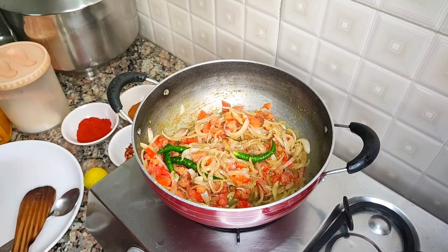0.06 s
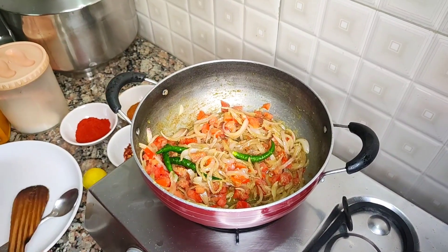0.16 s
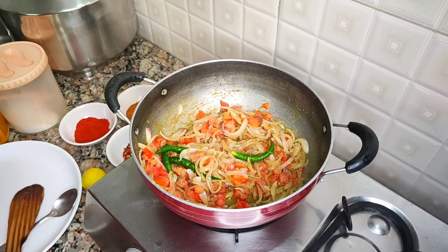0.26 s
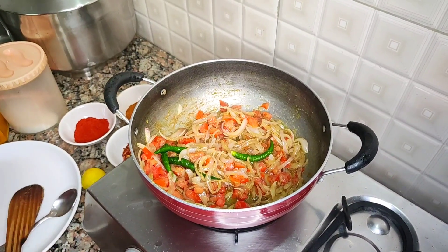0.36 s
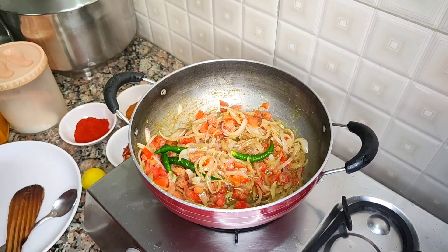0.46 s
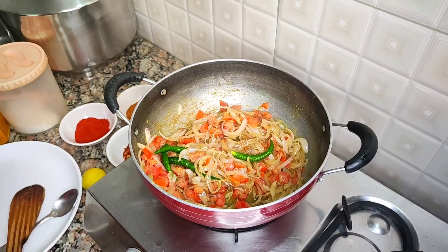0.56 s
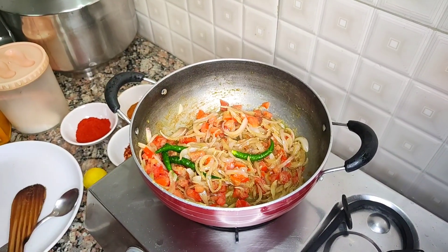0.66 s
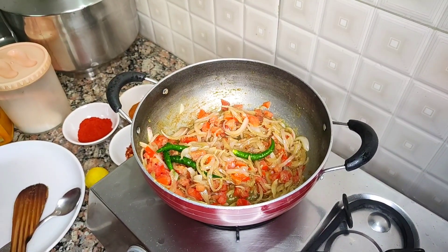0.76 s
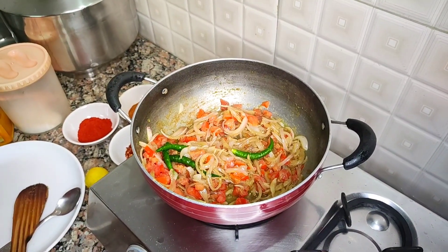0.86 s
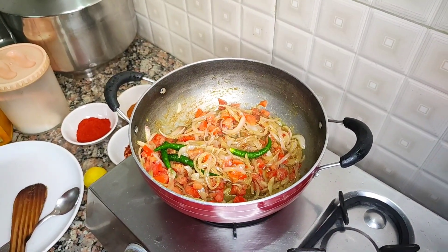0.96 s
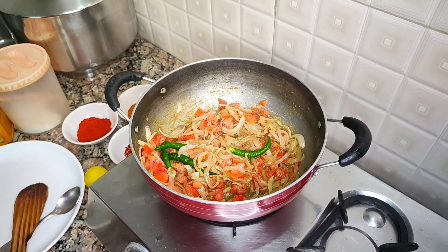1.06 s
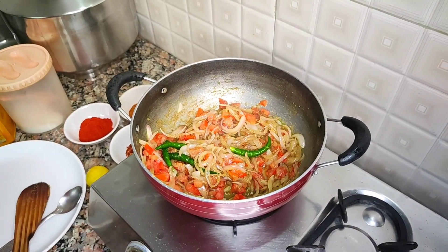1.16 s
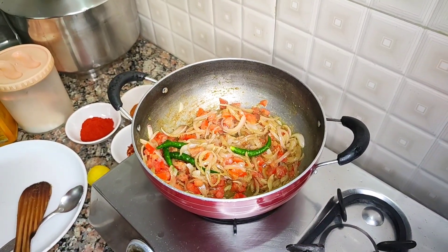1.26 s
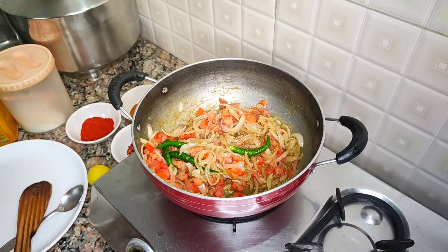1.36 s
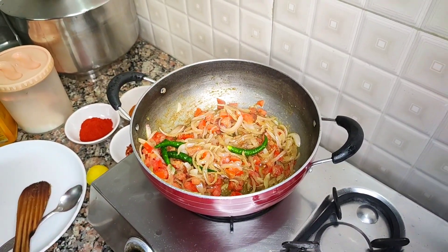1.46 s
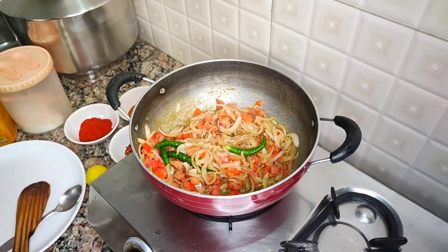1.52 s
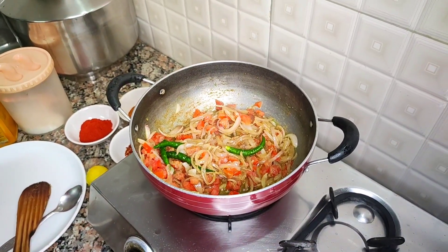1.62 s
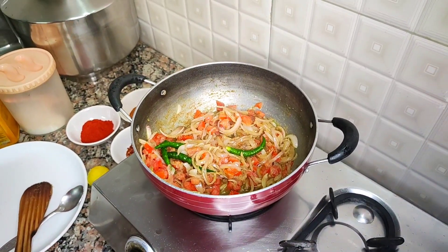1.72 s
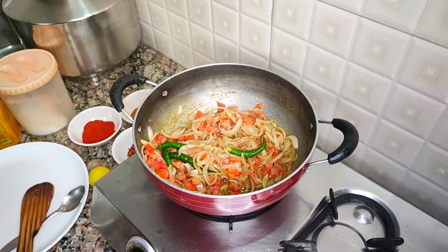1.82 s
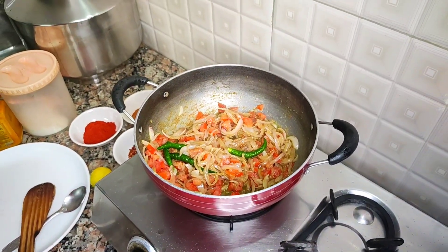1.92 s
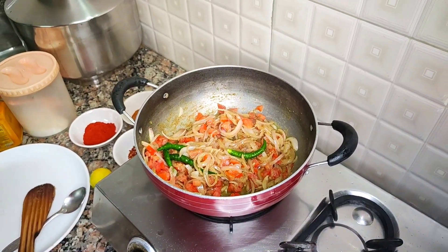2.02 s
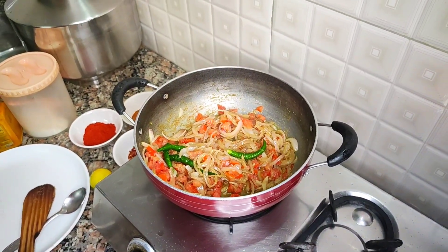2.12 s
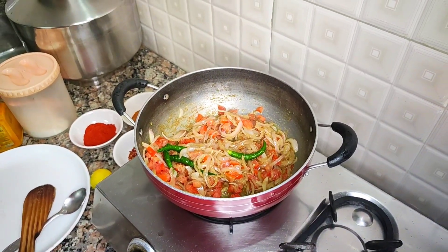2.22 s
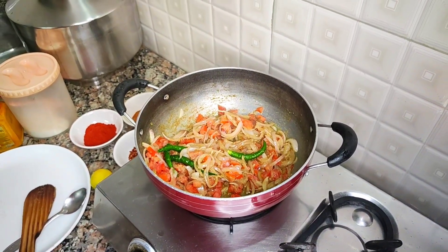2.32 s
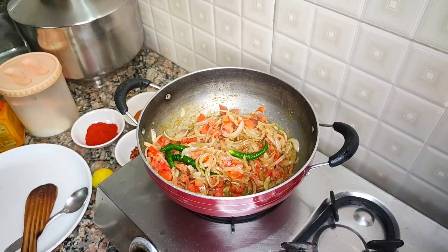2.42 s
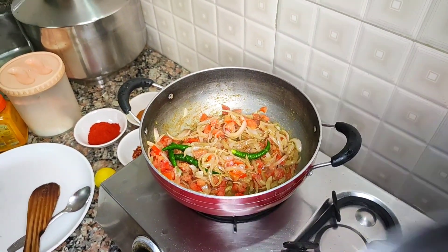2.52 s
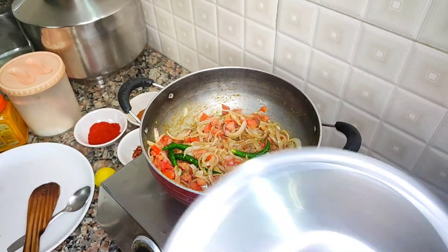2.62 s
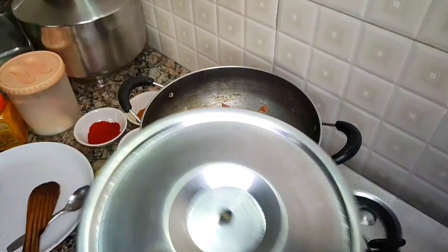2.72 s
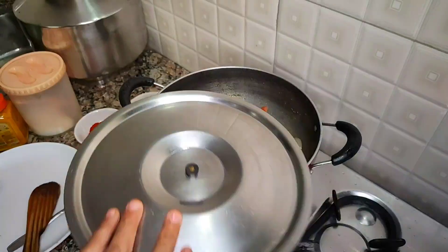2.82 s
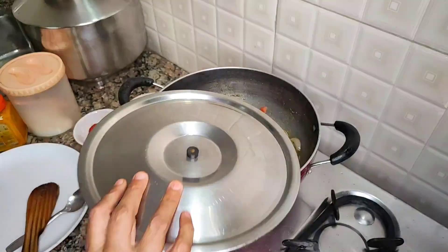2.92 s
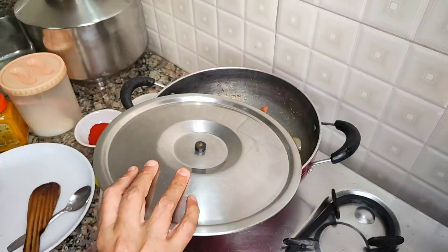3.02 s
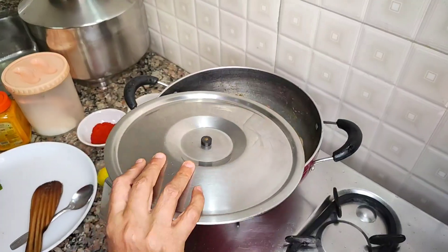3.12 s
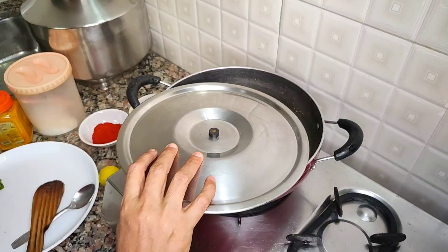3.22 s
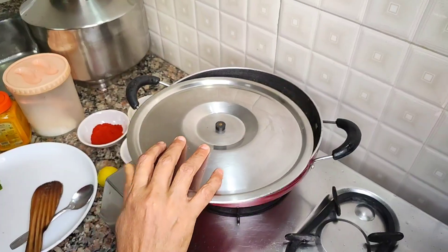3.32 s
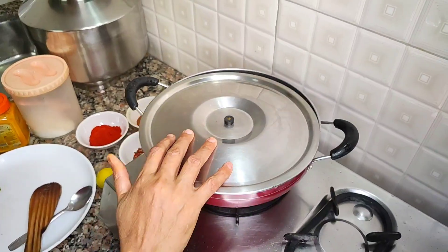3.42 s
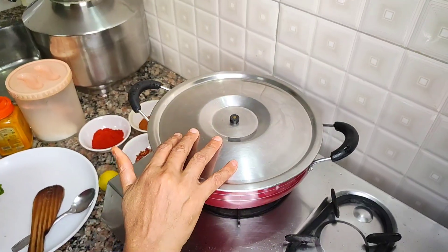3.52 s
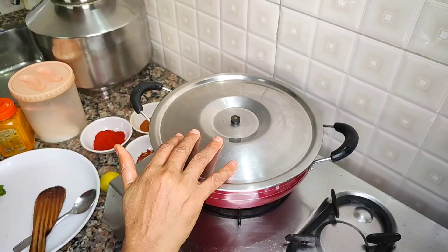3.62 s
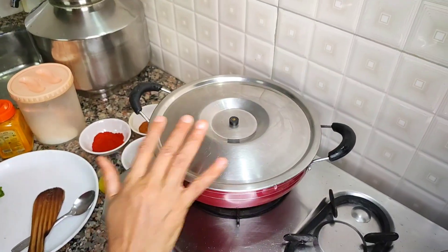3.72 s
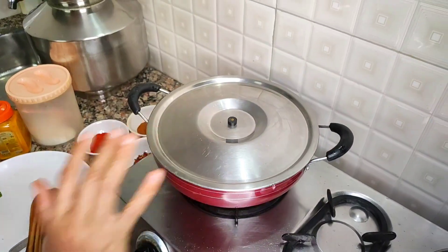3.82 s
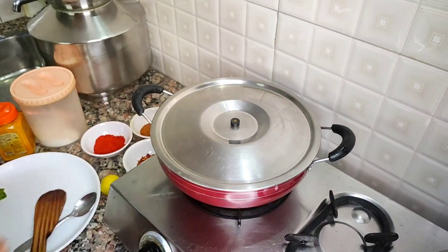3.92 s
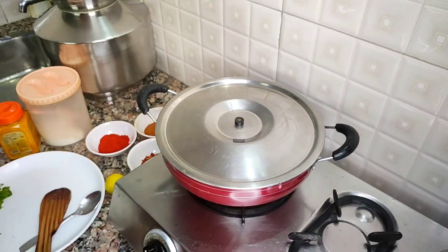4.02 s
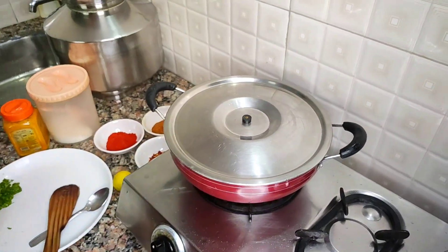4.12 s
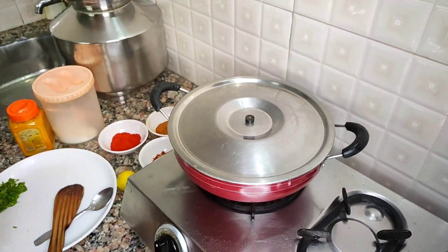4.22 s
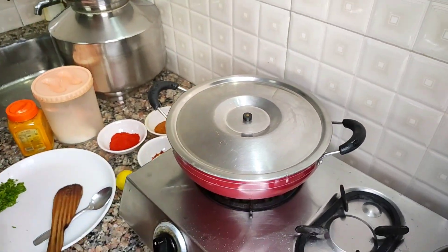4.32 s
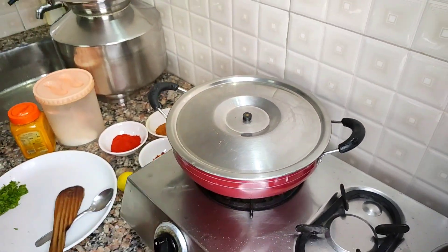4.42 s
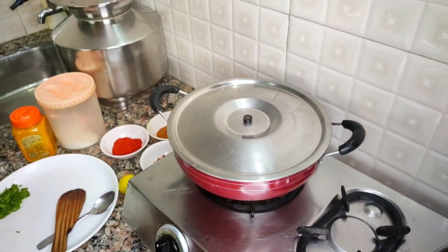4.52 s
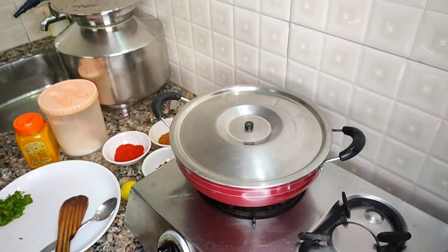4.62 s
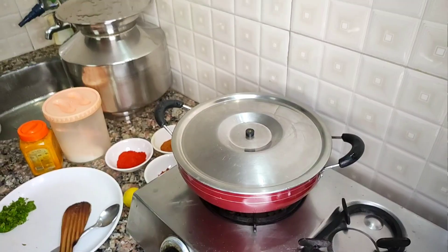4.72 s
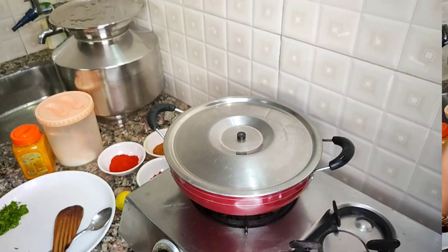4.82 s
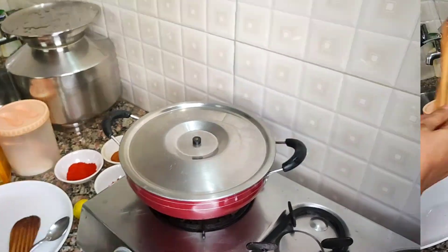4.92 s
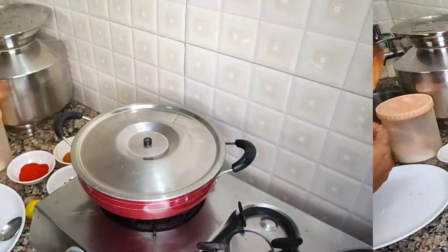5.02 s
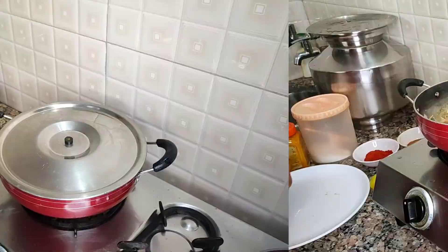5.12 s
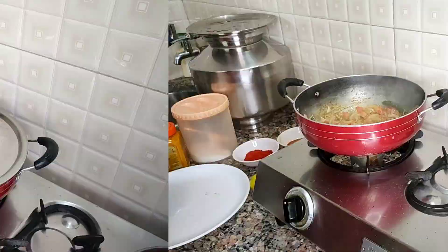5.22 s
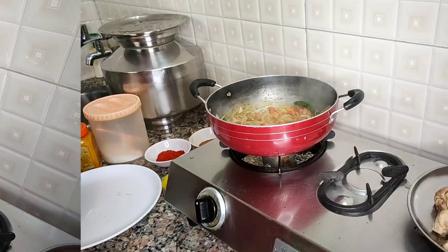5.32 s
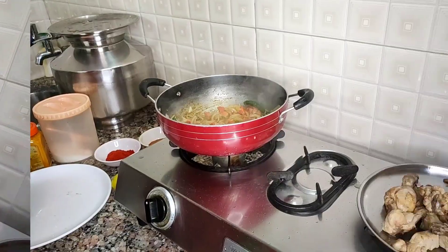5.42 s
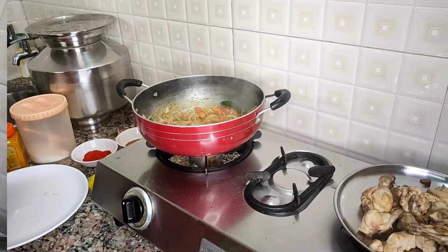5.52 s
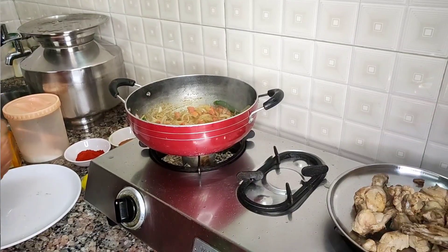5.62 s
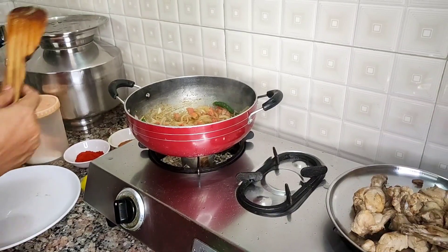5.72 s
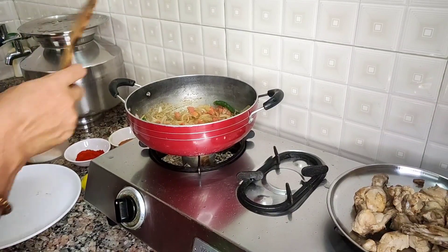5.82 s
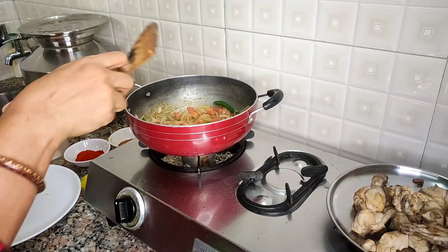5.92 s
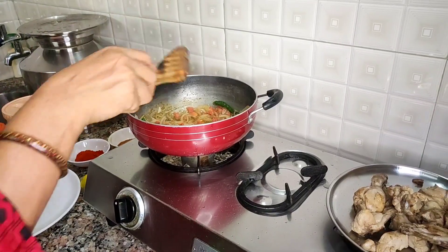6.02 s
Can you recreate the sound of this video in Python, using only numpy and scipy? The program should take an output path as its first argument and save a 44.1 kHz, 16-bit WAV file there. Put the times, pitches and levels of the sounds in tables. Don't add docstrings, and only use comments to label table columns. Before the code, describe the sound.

A dense, crackling frying hiss runs over low room rumble and a soft gas roar. Midway, thin metal clanks ring beside the stove; then the lid hits the rim with a heavier clang, scrapes and stutters into place, muffling the frying. Low thuds and a faint brush come next before the scene cuts to a farther, open sizzle swelling in. The small hard room gives short echoes.

```python
import sys
import numpy as np
from scipy import signal
from scipy.fft import rfft, irfft, next_fast_len
from scipy.io import wavfile
from scipy.ndimage import uniform_filter1d

SR = 44100
rng = np.random.default_rng(int(sys.argv[2]) if len(sys.argv) > 2 else 0)


def wav_record(signal):
    frames = np.transpose(np.atleast_2d(signal))
    bounded = np.clip(frames, -1, 1)
    quanta = np.round(bounded * 32767).astype(np.int16)
    wavfile.write(sys.argv[1], SR, quanta)


def undo_db(level):
    steps = np.asarray(level, float) / 20
    return 10 ** steps


N = 267150
FAR_FROM_S = 5.012


def unit_power(x):
    return x / np.sqrt(np.mean(x ** 2) + 1e-20)


def in_time(rows):
    s, *columns = np.transpose(rows)
    return [np.interp(np.arange(N) / SR, s, c) for c in columns]


def at_hz(points, hz):
    points = np.array(points)
    return np.interp(np.log(hz), np.log(points[:, 0]), points[:, 1])


def drift(rate_hz):
    r = np.exp(-80 * np.pi * rate_hz / SR)
    white = rng.standard_normal(N // 40 + 2002)
    slow = signal.lfilter([1], [1, -2 * r, r * r], white)[2000:]
    return np.interp(np.arange(N) / 40, np.arange(len(slow)), unit_power(slow))


def ring(clicks, hz, t60, rise_s=0.0027):
    turn = np.exp(2j * np.pi * hz / SR)
    pole = undo_db(-60 / (t60 * SR)) * turn
    soft = np.exp(-1 / (rise_s * SR))
    return signal.lfilter([1 - soft], np.convolve([1, -pole], [1, -soft * turn]), clicks + 1e-18).imag


def dying(clicks, t60):
    return signal.lfilter([1], [1, -undo_db(-60 / (t60 * SR))], clicks + 1e-18)


# frequency in Hz, likeness from -1 to 1.
COHERENCE = [(25, .94), (60, .97), (130, .86), (290, .78), (640, .36), (1400, .15), (3100, .05),
             (6800, -.05), (15000, -.05)]


def pair(white, hz):
    alike = np.clip(at_hz(COHERENCE, hz), -1, 1)
    return np.sqrt(1 + alike) * white[0] + np.sqrt(1 - alike) * white[1] * [[1], [-1]]


def banded(white, level_db, low_hz, count, patchy_db):
    out = 0
    together = drift(3.5)
    edges = low_hz * 2 ** (np.arange(count + 1) / 3)
    for k, (low, high) in enumerate(zip(edges, edges[1:])):
        sos = signal.butter(2, [low, high], "band", fs=SR, output="sos")
        band = signal.sosfilt(sos, white[k % 2])
        hz = np.sqrt(low * high)
        flicker_db = patchy_db * (0.19 * together + drift(6.4))
        out = out + undo_db(level_db(hz) + flicker_db) * pair(band, hz)
    return out


# time in seconds, share covered from 0 to 1.
LID_TRAVEL = [
    (3.05, 0.01),
    (3.3, 0.25),
    (3.54, 0.5),
    (3.63, .95),
    (4.0, 0.97),
]


def cover():
    return np.clip(in_time(LID_TRAVEL)[0], 0, 1) * (np.arange(N) <= FAR_FROM_S * SR)


# frequency in Hz, level in dB per Hz.
RUMBLE_SPECTRUM = [(14, -3), (24, 0), (32, -8), (42, -12), (55, -16), (90, -22), (140, -25)]
# frequency in Hz, level in dB per Hz.
FLAME_SPECTRUM = [(53, -41), (90, -12), (124, -4), (259, -12), (523, -9.5), (606, -22.5), (744, -9),
                  (1040, -17.5), (1300, -20.5), (1990, -20), (3000, -22), (3900, -56), (6600, -120)]
# frequency in Hz, bandwidth in Hz, level in dB.
RESONANCES = [(61.9, 12, -53), (125.1, 5.5, -58.5), (474, 67, -68), (1737, 38, -66), (2051, 32, -57.5)]
RUMBLE_DB, FLAME_DB = -45, -55
SHUT_RUMBLE_DB, SHUT_FLAME_DB = -4, 2.5
MOTOR_HZ, MOTOR_WANDER_HZ, MOTOR_DB = 60.9, 4.01, -54


def flame():
    rumble_db = RUMBLE_DB + SHUT_RUMBLE_DB * in_time(LID_TRAVEL)[0]
    flame_db = FLAME_DB + SHUT_FLAME_DB * cover()
    rumble = banded(rng.standard_normal((2, 2, N)), lambda hz: at_hz(RUMBLE_SPECTRUM, hz),
                    14.65, count=9, patchy_db=1.5)
    roar = banded(rng.standard_normal((2, 2, N)), lambda hz: at_hz(FLAME_SPECTRUM, hz),
                  90.7, count=15, patchy_db=0.9)
    out = undo_db(rumble_db) * unit_power(rumble) + undo_db(flame_db + 4.0) * unit_power(roar)
    far = np.arange(N) > FAR_FROM_S * SR
    for hz, width_hz, db in RESONANCES:
        t60 = np.log(1000) / (np.pi * width_hz)
        hum = ring(rng.standard_normal((2, N)), hz, t60)
        out += undo_db(db - far * hz / 300) * unit_power(pair(hum, hz))
    motor_level = undo_db(MOTOR_DB + 4.5 + 1.4 * drift(4))
    motor_hz = MOTOR_HZ + MOTOR_WANDER_HZ * drift(2.94)
    return out + motor_level * np.sin(2 * np.pi * np.cumsum(motor_hz) / SR)


KITCHEN_T60_S, WALL_CUT_HZ = 0.34, 7200


def kitchen(x):
    size = next_fast_len(N + SR)
    hz = np.arange(size // 2 + 1) * SR / size
    spectrum = rfft(x, size)
    out = np.zeros((2, N))
    for k, lag_s in enumerate(rng.uniform(.008, .03, 16)):
        delay = np.exp(-2j * np.pi * hz * lag_s)
        loop = undo_db(-60 * lag_s / KITCHEN_T60_S) * delay / (1 + 1j * hz / WALL_CUT_HZ)
        out[k % 2] += irfft(spectrum * loop / (1 - loop), size)[:N] * (-1) ** (k // 2)
    return out


# start in seconds, peak in dB, mode in Hz, T60 in seconds,
# level of the rustle against the peak in dB.
COUNTER_KNOCKS = [
    (0.328, -41.5, 308, 0.14, -2),
    (2.456, -30, 342, 0.028, -9),
    (3.575, -35.5, 200, 0.07, -4),
    (3.599, -37, 311, 0.091, -11),
    (3.811, -36, 430, 0.1, -7),
    (3.855, -36, 301.5, 0.21, -25),
    (4.864, -31, 304, 0.036, -6),
    (4.883, -29.5, 236, 0.023, -31),
    (5.486, -40.5, 206, 0.1, -2),
]


def knocks():
    out, rustle = np.zeros(N), np.zeros(N)
    for s, db, hz, t60, rustle_db in COUNTER_KNOCKS:
        click = np.zeros(N)
        click[round(s * SR)] = undo_db(db)
        out += ring(click, hz, t60) + 0.3 * ring(click, 1.4 * hz, 1.4 * t60)
        rustle += click * undo_db(rustle_db)
    sos = signal.butter(2, [150, 800], "band", fs=SR, output="sos")
    dull = signal.sosfilt(sos, rng.standard_normal((2, N)))
    return out + 3.5 * dull * dying(rustle, 0.26)


# peak time in seconds, level in dB, decay in dB per second.
ROCKING = [
    (1.795, -29, 263),
    (1.87, -42, 12),
    (2.03, -33, 100),
    (2.105, -33.5, 122),
    (3.15, -23.5, 130),
    (3.29, -33.5, 395),
]
ROCK_LASTS_S = .17
SLIDE_FROM_S, SLIDE_TO_S, SLIDE_DB, STUTTER_DB = 3.24, 3.63, -33, 1.6
SLIDE_SAGS_DB_PER_S, SLIDE_DIES_DB_PER_S = 17, 120
AIR_OPEN_HZ, AIR_SHUT_HZ, AIR_LAW = 748, 380, .75
UPPER_DB, UPPER_FOLLOWS, UPPER_SHUT_DB = -6, 0.38, -27


def chatter(per_s=700):
    t, shut = np.arange(N) / SR, cover()
    slide_db = SLIDE_DB + STUTTER_DB * drift(40) - SLIDE_SAGS_DB_PER_S * (t - SLIDE_FROM_S)
    slide_db = slide_db - SLIDE_DIES_DB_PER_S * np.maximum(t - SLIDE_TO_S, 0)
    level = (t > SLIDE_FROM_S) * (t < SLIDE_TO_S + ROCK_LASTS_S) * undo_db(slide_db)
    for s, db, dies_db in ROCKING:
        rock = (t > s) * (t < s + ROCK_LASTS_S) * undo_db(db - dies_db * np.abs(t - s))
        level = np.maximum(level, rock)
    air_hz = AIR_OPEN_HZ + (AIR_SHUT_HZ - AIR_OPEN_HZ) * shut ** AIR_LAW
    upper_db = UPPER_DB - UPPER_FOLLOWS * (20 * np.log10(level + 1e-3) + 30) + UPPER_SHUT_DB * shut
    touches = (rng.random(N) < per_s / SR) * undo_db(2.47 * np.minimum(rng.exponential(1, N), 4))
    return touches * level, air_hz, upper_db


def trapped_air(touches, air_hz, air_db=-12):
    phase = np.exp(2j * np.pi * rng.random((2, N)))
    kicks = touches * (np.arange(N) > LID_TRAVEL[0][0] * SR) * phase
    swing = dying(dying(kicks, .02), .01) * undo_db(air_db - 34 + 6 * drift(14))
    return pair((swing * np.exp(2j * np.pi * np.cumsum(air_hz) / SR)).imag, 530)


# frequency in Hz, level in dB, T60 in seconds.
LID_MODES = [(307, -15, .2), (425, -16, .16), (487, -21, .16), (583, -12, .14), (608, -7, .18),
             (672, -2, .13), (706, -1, .19), (731, -1, .14), (760, -1, .17), (788, -2, .14), (830, -6, .1),
             (875, -6, .16), (1335, -13, .2), (1440, -14, .15), (2040, -6, .17), (2105, -7, .16),
             (2290, -12, .08), (2630, -6, .12), (2720, -2, .22), (2845, -2, .2), (2945, -7, .1),
             (3360, -10, .08), (3810, -9, .08), (4430, -9, .07), (4975, -6, .08), (5760, -8, .05),
             (6260, -7, .06), (7600, -6, .07), (8440, -6, .05), (9630, -7, .06)]
# start in seconds, level of the low modes in dB, middle modes against
# the low in dB, high modes against the low in dB, left-right difference in dB.
LID_BLOWS = [(1.779, -28.5, 8.5, 10.5, 6), (1.789, -24, -11, -11, -10), (1.808, -32.5, 12, -15, 5),
             (1.99, -15.5, 4, 3.5, 10), (2.017, -18, 0.5, -4.5, -4), (2.057, -36, -14, -6, -4.0),
             (2.113, -23.5, 2.5, -2, 4), (2.173, -30.5, -1, 0, 10), (3.08, -11.5, -11, -4.5, -1),
             (3.091, -21, -10, -8, -1), (3.107, -26.5, -10, 2.5, -3), (3.139, -10, -12, -4, 0),
             (3.164, -22, -18, -21, 1), (3.177, -18.5, -14, -1.5, -1), (3.192, -24.5, -15, -3, 0),
             (3.213, -20.5, -21, -21, 11)]


def lid(blow_db=-11, touch_db=-19, crack_db=4, crack_t60=0.038):
    s, low_db, mid_db, high_db, pan_db = np.transpose(LID_BLOWS)
    at = np.round(s * SR).astype(int)
    sides = undo_db(np.outer([.5, -.5], pan_db))
    touches, air_hz, upper_db = chatter()
    out = np.zeros((2, N))
    span = slice(round(1.7 * SR), round(4.2 * SR))
    felt = np.flatnonzero(touches)
    for hz, db, t60 in LID_MODES:
        if hz > 1100:
            share = undo_db(upper_db[felt])
        else:
            share = undo_db(-.7 * db) * np.exp(-.5 * (np.log2(hz / air_hz[felt]) / .32) ** 2)
        turn = np.exp(1j * rng.normal(0, min(hz / 1100, 3), (2, 1)))
        clicks = np.zeros((2, N), complex)
        phase = np.exp(2j * np.pi * rng.random(len(felt)))
        clicks[:, felt] = touches[felt] * share * undo_db(db + touch_db) * phase * turn
        tilt_db = np.array([at_hz([(900, 0), (2000, m), (3200, m), (4500, h)], hz)
                            for m, h in zip(mid_db, high_db)])
        chance = rng.standard_normal((len(at), 4))
        strength = undo_db(low_db + tilt_db + db + blow_db + 1.1 * chance[:, 0])
        angle = .3 * chance[:, 1] + min(hz / 1200, 3) * chance[:, 2:].T
        clicks[:, at] += strength * sides * np.exp(1j * angle)
        out[:, span] += ring(clicks[:, span], hz, t60, rise_s=0.0023)
        twin_hz = hz * rng.choice([.975, 1.025])
        out[:, span] += 0.8 * ring(1j * clicks[::-1, span], twin_hz, 0.81 * t60)
    cracks = np.zeros((2, N))
    cracks[:, at] = undo_db(low_db + high_db + crack_db) * sides
    cracks += touches * undo_db(upper_db - 12)
    sos = signal.butter(1, [1600, 12000], "band", fs=SR, output="sos")
    bright = signal.sosfilt(sos, rng.standard_normal((2, N)))
    grit = dying(cracks, crack_t60) - dying(cracks, 0.0072) + 0.088 * dying(cracks, 0.26)
    return out + bright * grit + trapped_air(touches, air_hz)


# time in seconds, level in dB.
VIGOUR = [
    (0, -31.5),
    (.4, -30),
    (.6, -30),
    (1.76, -31),
    (2.3, -32),
    (2.8, -33.5),
    (3.05, -32),
    (5.0, -33.5),
]
SHUT_LOSS_DB = 11.5
OPEN_TILT_DB, SLIDING_TILT_DB, SHUT_TILT_DB = 0.57, -9.5, 0.4
BRUSH_S, BRUSH_DB, BRUSH_T60_S, BRUSH_TILT_DB = 4.868, -43.5, 0.43, -3.5
FADE_OUT_DB, FADE_OUT_S = 6, 0.085
FAR_DB, FAR_START_DB, FAR_RISE_S, FAR_TILT_DB = -33, -7, 0.67, 0.5


def frying():
    t, shut = np.arange(N) / SR, cover()
    brush = (t > BRUSH_S) * undo_db(-60 * np.abs(t - BRUSH_S) / BRUSH_T60_S)
    near = undo_db(in_time(VIGOUR)[0] - SHUT_LOSS_DB * shut) + undo_db(BRUSH_DB - 2.5) * brush
    near_db = 20 * np.log10(near) - FADE_OUT_DB * np.clip(1 - (FAR_FROM_S - t) / FADE_OUT_S, 0, 1)
    far_db = FAR_DB + FAR_START_DB * np.clip(1 - (t - FAR_FROM_S) / FAR_RISE_S, 0, 1)
    tilt_db = OPEN_TILT_DB + SLIDING_TILT_DB * shut * (1 - shut) + SHUT_TILT_DB * shut ** 2
    tilt_db = tilt_db + BRUSH_TILT_DB * brush
    far = t > FAR_FROM_S
    return np.where(far, far_db, near_db), np.where(far, FAR_TILT_DB, tilt_db)


def mottled(x, contrast=0.86, hole=0.22, from_hz=2200):
    hz, _, cells = signal.stft([x[0] + x[1], x[0] - x[1]], SR, nperseg=2048, noverlap=1024)
    power = np.abs(cells) ** 2 + 1e-20
    wide = np.abs(uniform_filter1d(power, size=80, axis=1)) + 1e-14
    patch = (np.abs(uniform_filter1d(power, size=7, axis=1)) + 1e-14) / wide
    gain = (power / wide) ** (.5 * contrast) / (1 + (hole / patch) ** 8)
    gain /= np.sqrt(np.abs(uniform_filter1d(power * gain ** 2, size=80, axis=1)) / wide + 1e-6)
    cells *= np.where(hz[:, None] > from_hz, gain, 1)
    mid, side = signal.istft(cells, SR, nperseg=2048, noverlap=1024)[1][:, :N]
    return np.array([mid + side, mid - side]) / 2


# frequency in Hz, level in dB per Hz.
NEAR_SPECTRUM = [(500, -8.5), (900, -7.5), (1300, -7), (1700, -8), (2200, -4), (3200, -3), (3800, -0.5),
                 (6000, -0.5), (9500, 1), (13000, -5.5), (16000, -8.5)]
# frequency in Hz, level in dB per Hz.
FAR_SPECTRUM = [(500, -2.5), (900, -10.5), (1300, -10.5), (1700, -12.5), (2200, -7.5), (3400, -6),
                (5000, -5.5), (8000, -2), (10000, -1), (13000, -6), (16000, -8)]
# start in seconds, peak in dB.
OIL_SPITS = [(0.2306, -25), (0.2543, -28), (0.2764, -36), (0.317, -12), (0.3372, -14), (0.344, -13),
             (0.4164, -29), (0.4886, -16), (1.361, -14), (1.6601, -24), (2.5066, -18), (3.008, -19)]


def sizzle(per_s=900, spread_db=2.0, burst_t60=0.001, burst_db=-4, spit_db=32):
    level_db, bright_db = frying()
    born = rng.random(N) < per_s * undo_db(3.0 * drift(7)) / SR
    bursts = born * undo_db(burst_db + spread_db * np.minimum(rng.exponential(1, N), 5))
    for s, db in OIL_SPITS:
        bursts[round(s * SR)] += undo_db(db + spit_db)
    white = rng.standard_normal((2, 2, N)) * (1 + dying(bursts, burst_t60))
    far = np.arange(N) > FAR_FROM_S * SR

    def colour(hz):
        spectrum_db = np.where(far, at_hz(FAR_SPECTRUM, hz), at_hz(NEAR_SPECTRUM, hz))
        return spectrum_db + bright_db * np.log2(max(hz, 3000) / 7000)

    hiss = mottled(banded(white, colour, 561.0, count=15, patchy_db=0.74))
    scale = np.where(far, np.std(hiss[:, far]), np.std(hiss[:, ~far]))
    return undo_db(level_db + 0.87) * hiss / scale


def scene():
    blows = lid() + knocks()
    return sizzle() + flame() + blows + undo_db(-13) * kitchen(blows.mean(axis=0))


def band_limit(x):
    return signal.sosfilt(signal.butter(12, 16980, fs=SR, output="sos"), x)


def record(dry):
    sos = signal.cheby2(26, 70, 16060, fs=SR, output="sos")
    mix = signal.sosfilt(sos, dry)
    return band_limit(mix)


dry = scene()
out = record(dry)
wav_record(out)
```